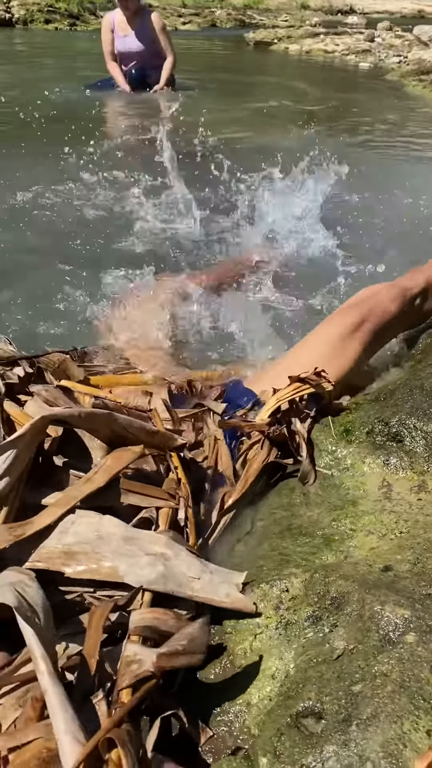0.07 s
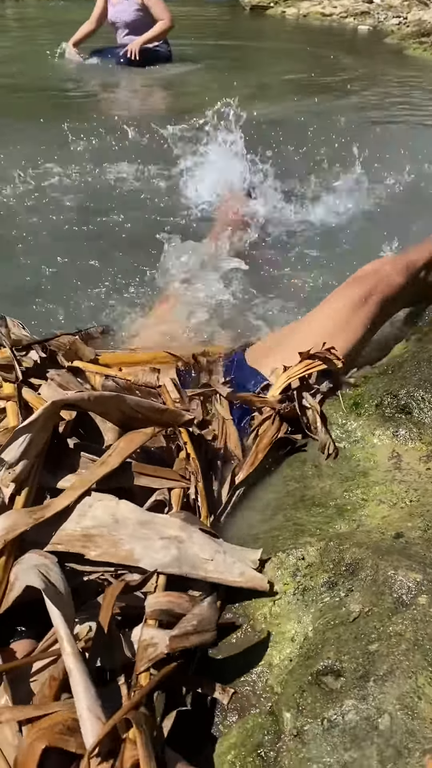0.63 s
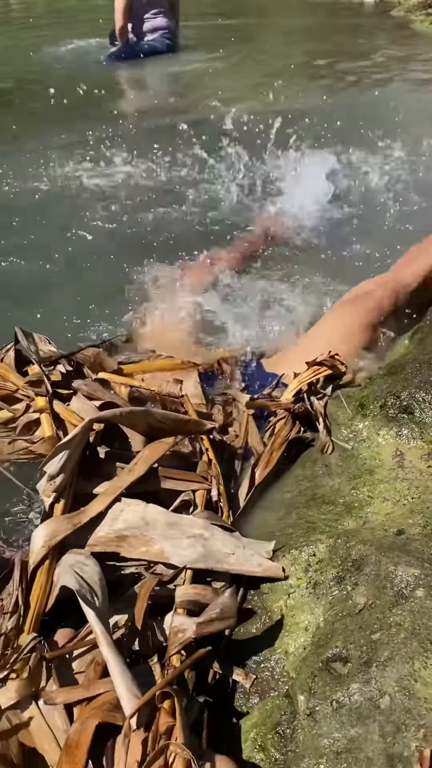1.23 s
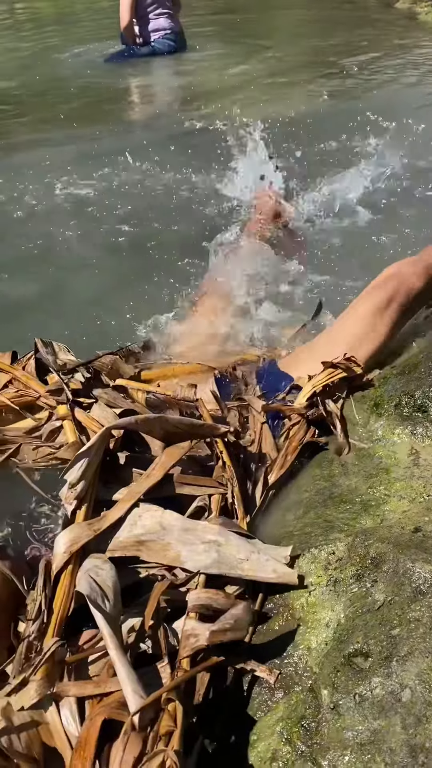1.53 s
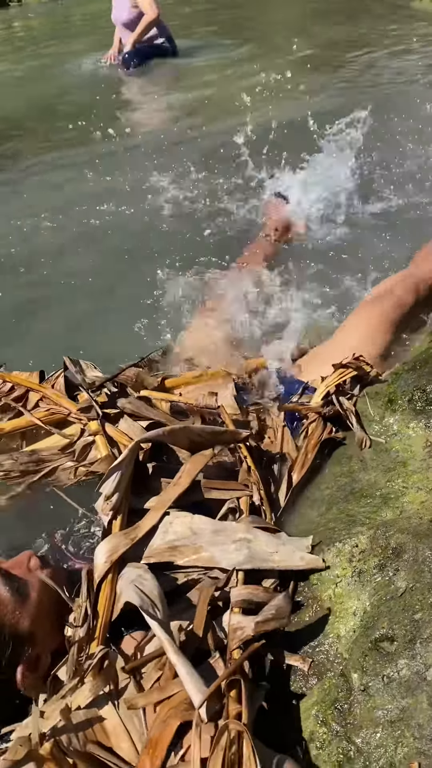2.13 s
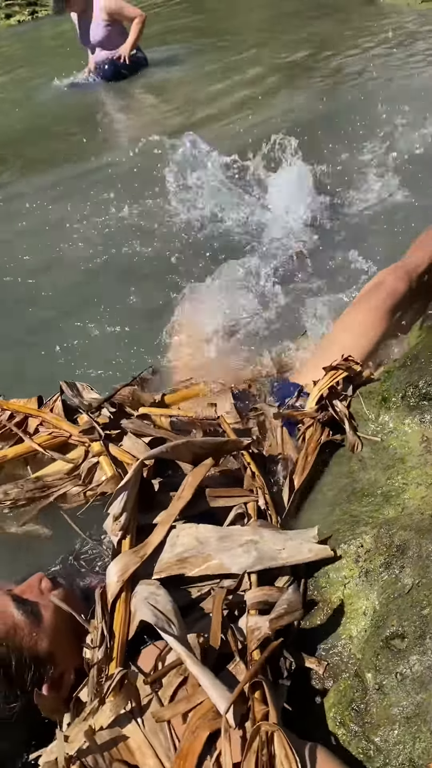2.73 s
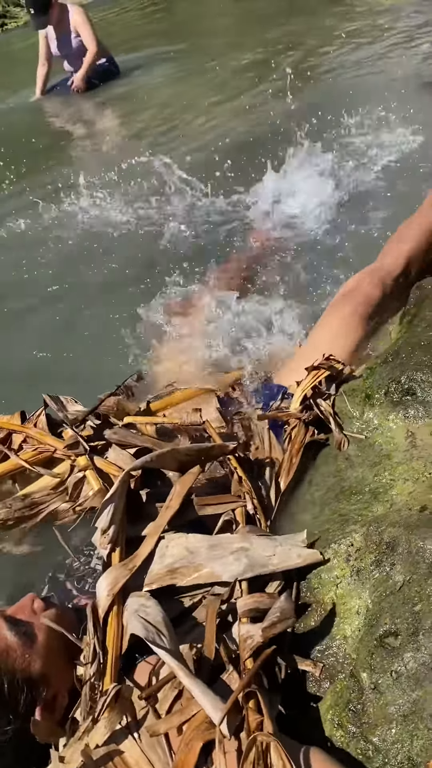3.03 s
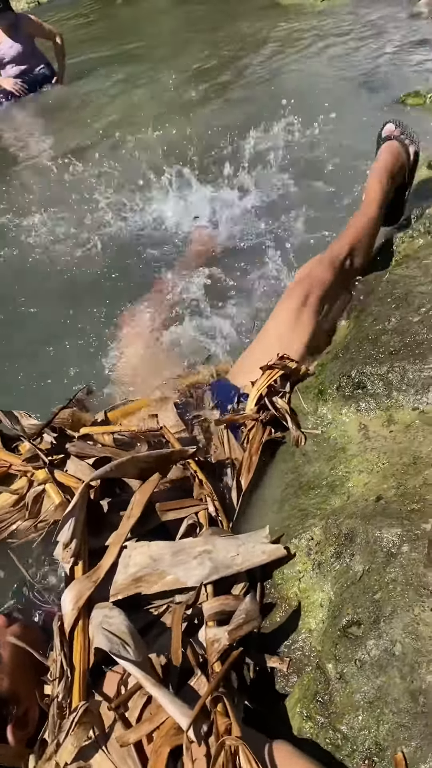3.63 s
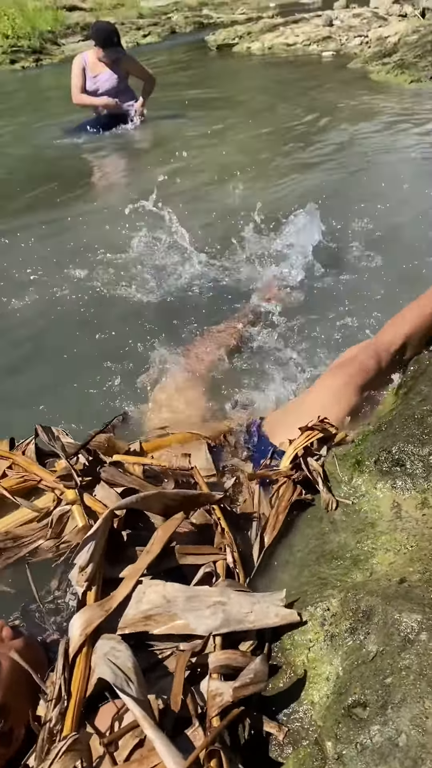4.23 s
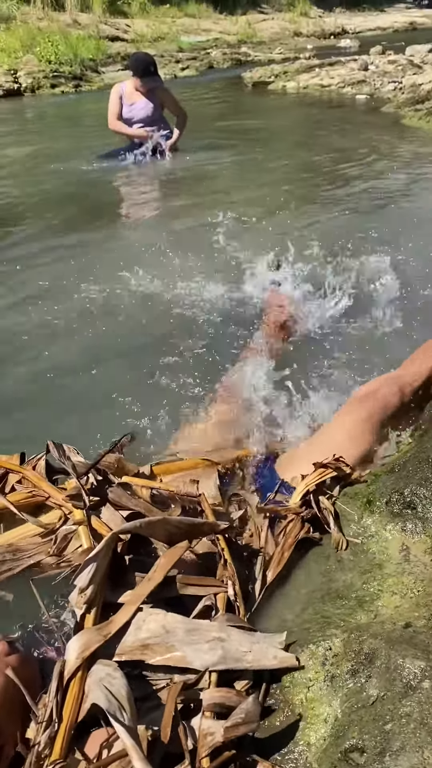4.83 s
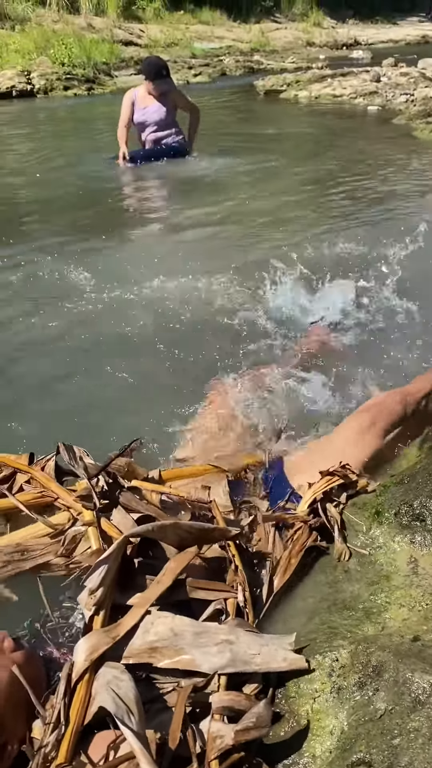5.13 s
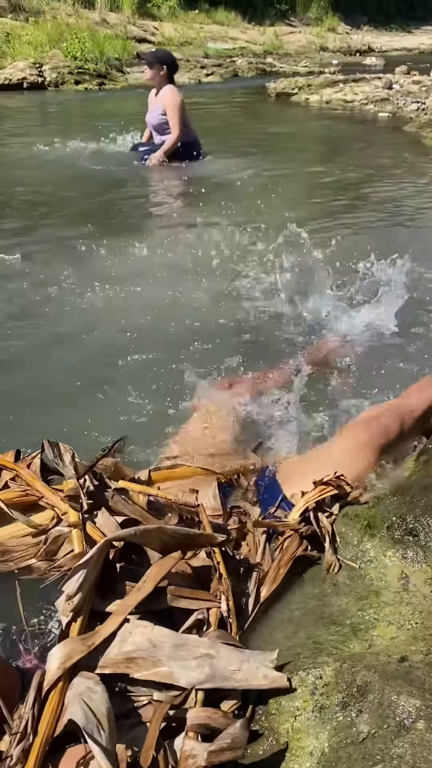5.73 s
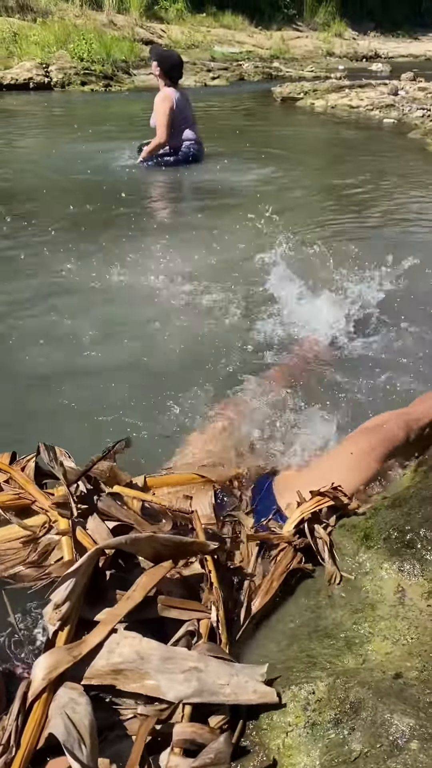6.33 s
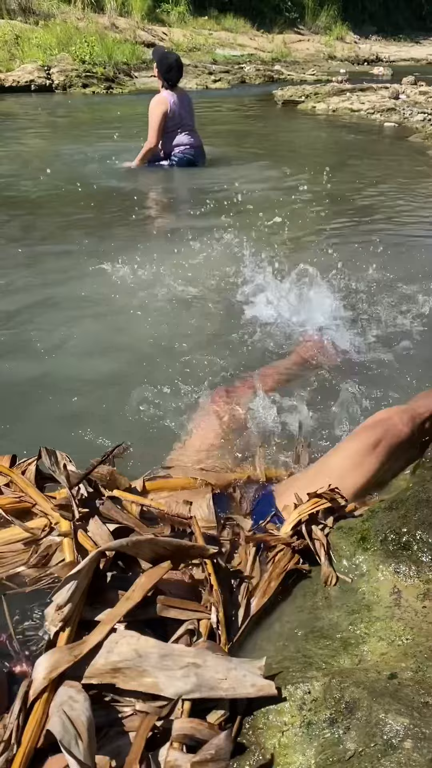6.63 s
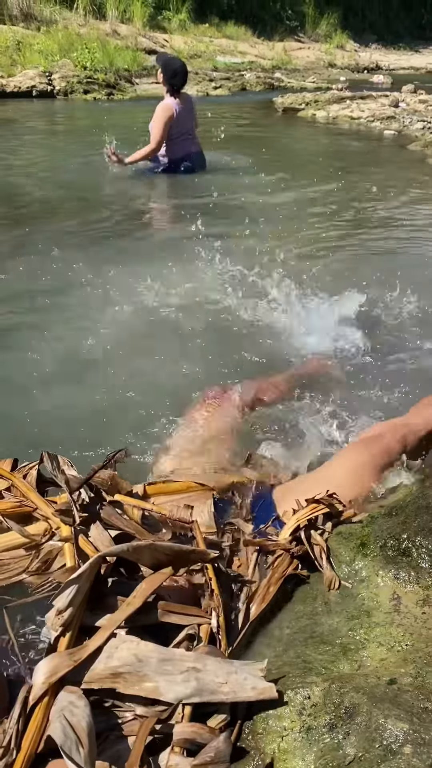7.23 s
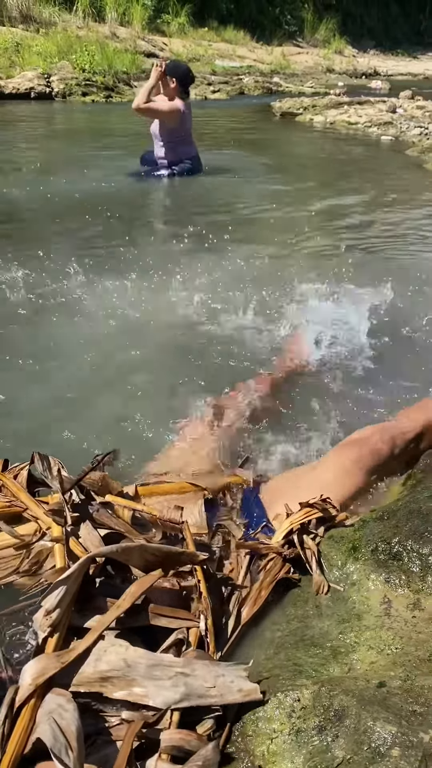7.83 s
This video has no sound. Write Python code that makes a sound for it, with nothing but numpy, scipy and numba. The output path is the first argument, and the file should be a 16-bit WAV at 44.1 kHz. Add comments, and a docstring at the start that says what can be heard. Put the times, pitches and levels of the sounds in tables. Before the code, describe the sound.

A swimmer kicks steadily in a shallow river, with churning bubbles, deep gulps and splashing spray, and light wind on the microphone.

```python
"""A swimmer kicks steadily in a shallow river, a couple of metres from the microphone.
The legs churn air under (gurgling bubbles, single deep gulps) and thrown water falls back
(splash, spray, sharp slaps). Light wind touches the microphone and a faint low drone wavers
behind. Near the end the sound drops out for a moment."""
import sys
import numpy as np
from scipy import signal
from scipy.fft import rfft, irfft, next_fast_len
from scipy.io import wavfile
from scipy.ndimage import uniform_filter1d
from numba import njit

SR = 44100
rng = np.random.default_rng(int(sys.argv[2]) if len(sys.argv) > 2 else 0)


def unload_wav(signal):
    """Save mono or channel-first audio to the path in sys.argv[1] as 16-bit WAV at rate SR, clipped to [-1, 1]."""
    wavfile.write(
        sys.argv[1],
        SR,
        np.round(np.clip(np.atleast_2d(signal).T, -1, 1) * 32767).astype(np.int16),
    )


N = 347067
TIME = np.arange(N) / SR
FFT_SIZE = next_fast_len(N + 4096)
BINS_HZ = np.maximum(np.arange(FFT_SIZE // 2 + 1) * SR / FFT_SIZE, 1)

# A foot drives through the water; levels are against each layer's steady wash:
# (time [s], length [s], churn [dB], gurgle [dB], splash [dB])
FOOT_KICKS = [(0.0, 0.095, -1.5, -1, -5.5), (0.188, 0.056, -7, 0.5, -11.5), (0.25, 0.054, 0, 0, -0.5),
              (0.457, 0.11, 2, 1.5, -2), (0.74, 0.018, -4.5, -8, -2), (0.84, .025, 4, -7.5, -16.5),
              (0.95, 0.061, -18, -10.5, -2), (1.174, .025, 4, -15.5, -4), (1.357, 0.072, 0, -5.5, -5),
              (1.608, 0.05, 0, -0.5, -1), (1.848, 0.014, 3, 3, -14), (2.037, 0.064, -2, 0.5, -5.5),
              (2.252, 0.076, -0.5, -8.5, -1.5), (2.43, 0.14, -9, 1, -12), (2.635, .015, -9, -3, -8),
              (2.794, 0.027, -11, 4.5, -1), (2.89, 0.11, -15, -2, -17), (3.003, 0.031, -5, -12.5, -2.5),
              (3.13, .015, 2.5, -6, -11), (3.258, 0.014, -14, -2, 0), (3.39, .015, -13, -17, -20),
              (3.47, 0.083, -2.5, 0, -5), (3.709, 0.038, 4.5, -5, -5.5), (3.955, 0.072, -5.5, 1.5, -8),
              (4.192, 0.019, -2, 1.5, 0.5), (4.489, 0.017, -12, 6, -0.5), (4.701, 0.062, -15.5, 0.5, -2.5),
              (4.825, 0.012, -11, -0.5, -5), (5.017, 0.17, -0.5, -10, -22), (5.153, 0.11, -6, -4.5, -6.5),
              (5.405, 0.014, -0.5, -2.5, -22), (5.461, 0.04, -13, -7.5, -13.5), (5.745, 0.07, 4, -0.5, -5),
              (6.001, 0.042, 2, -3, -2), (6.431, 0.11, 1, -4.5, -23), (7.569, 0.052, 3, 0, -1),
              (7.738, .025, 4, 2.5, -1)]
# Overall vigour of the kicking: (time [s], gain [dB])
KICK_EFFORT = [(0, -0.1), (1.5, 0.26), (2.2, 0), (3.0, -0.15), (4.4, -0.2), (5.2, 0.03), (6.6, -0.3),
               (7.52, -2.5), (7.62, -2.4), (7.87, -0.6)]
# Between kicks the water briefly settles, or now and then lifts: (centre [s], length [s], gain [dB])
WATER_LULLS = [(0.432, 0.045, -0.5), (0.6, 0.032, -2), (1.633, 0.049, -4.5), (2.223, 0.046, -4),
               (2.7, 0.031, -1.5), (3.37, 0.05, -5.5), (3.69, 0.031, 3), (4.39, 0.057, -3),
               (4.463, 0.034, -0.5), (4.947, 0.036, -1), (5.575, 0.046, -0.5), (5.66, 0.05, -0.5),
               (6.237, .06, 1)]
# The gurgle is darker midway: (time [s], small bubbles against large [dB])
GURGLE_TILT = [(0, 4), (1.5, -0.5), (2.5, -4), (4.3, -2.5), (6.1, 2.5)]
# A wave thrown up by a leg folds over: (time [s], length [s], level [dB])
FOLDING_WAVES = [(0.035, 0.078, -32.5), (0.187, 0.051, -28.5), (0.375, 0.083, -29.5), (0.492, 0.028, -29.5),
                 (0.628, 0.039, -30), (1.066, 0.084, -31.5), (1.265, 0.044, -31), (1.4, 0.055, -28),
                 (1.548, 0.14, -32), (2.076, 0.042, -32), (5.81, 0.063, -30.5), (5.924, 0.11, -29.5),
                 (6.253, 0.017, -34), (6.378, 0.032, -31.5)]
# Water hits the surface, from broad sheets (low, long) to fat drops (high, short):
# (time [s], level [dB], centre [Hz], width [octaves], fade [s])
SURFACE_SLAPS = [(0.192, -20.5, 1400, 1.5, .006), (0.209, -25, 2300, 2.2, .003),
                 (0.2297, -25, 1400, 2.2, .003), (0.3105, -22.5, 5500, 2, .0018),
                 (0.3205, -25.5, 10000, .7, .0015), (0.4189, -28, 7000, 1.5, .002),
                 (0.5083, -26.5, 6000, 1.5, .005), (0.5365, -17, 3000, 2, 0.0035),
                 (0.5425, -22, 3500, 2.7, .0026), (0.752, -20, 1180, 1, 0.0068),
                 (0.772, -23, 1700, 1.8, .007), (0.781, -24, 1800, 2, .005), (0.805, -33, 7000, 1, 0.0044),
                 (0.868, -23, 2100, 1.3, .005), (0.982, -23, 2200, 1.8, .007),
                 (1.058, -22.5, 8500, 0.68, .0016), (1.203, -21, 2280, 0.88, .0033),
                 (1.222, -21, 1700, 0.98, .005), (1.5025, -27, 8000, 1, 0.0024),
                 (1.6774, -27, 7000, 2, .002), (2.4415, -27, 3000, 3.7, .005),
                 (2.4448, -17.5, 8580, 1.8, 0.0028), (2.898, -29, 5500, 2, .0026),
                 (3.1208, -21, 2300, 0.66, .003), (3.272, -29, 7000, 2, .0016),
                 (3.397, -26, 1700, 1.8, .0015), (3.485, -27.5, 8500, 1.2, 0.014),
                 (3.667, -24.5, 8470, 1, 0.0022), (3.7514, -23, 1350, 1.6, .005),
                 (3.7941, -22, 1330, 1.05, .0055), (3.994, -21.5, 1400, 2, .0048),
                 (4.005, -24, 7440, 1.3, 0.0021), (4.2028, -20, 1690, 1.4, 0.0037),
                 (4.2223, -25.5, 2600, 1.4, 0.00343), (4.326, -24, 4980, 1.6, .002),
                 (4.5138, -22.5, 1900, 1.5, 0.0061), (4.5381, -26, 7000, 1.05, 0.0022),
                 (4.73, -23, 7550, 1.5, 0.0029), (4.9044, -25.5, 1850, 1.5, .003),
                 (5.128, -22, 1500, 2, 0.0054), (5.2338, -21.5, 8070, 1.2, .002),
                 (5.264, -26, 10100, .7, .0015), (5.4475, -30.5, 7070, 1.8, .0017),
                 (5.5, -26, 2200, 1.3, 0.017), (5.7543, -24.5, 1697, 1.4, 0.0046),
                 (5.906, -22, 3000, 1.53, 0.0035), (6.35, -23, 7460, 1.04, 0.0035),
                 (6.5058, -25.5, 8000, 1.2, 0.0027), (7.634, -25, 2180, 1.04, 0.0093),
                 (7.7134, -33, 2000, 1.8, .005)]

# Short rings: (time [s], level [dB], pitch [Hz], fade [cycles])
AIR_GULPS = [(0.032, -20.5, 440, 4), (0.066, -26, 230, 2), (0.197, -21.5, 199, 1.4),
             (0.2188, -19.5, 625, 4), (0.228, -29, 230, 2.2), (0.2291, -15, 1070, 1.1),
             (0.2777, -20, 376, 3.5), (0.3028, -18.5, 400, 4.5), (0.445, -20, 273, 0.79),
             (0.4753, -16.5, 610, 2), (0.5123, -17.5, 724, 1), (0.5277, -29.5, 442, 4),
             (0.5671, -20.5, 590, 2), (0.6147, -17.5, 1180, 1.7), (0.6478, -18.5, 690, 4.3),
             (0.7566, -19.5, 707, 6), (0.7713, -22.5, 390, 3.2), (0.7878, -25, 370, 3),
             (0.8831, -20.5, 610, 4), (1.014, -24, 427, 4), (1.0588, -15.5, 1200, 2.5),
             (1.1922, -19, 825, 4.4), (1.198, -27, 347, 4.4), (1.345, -21.5, 720, 2.5),
             (1.4523, -18.5, 440, 3.5), (1.5728, -18.5, 487, 3.7), (1.8563, -21.5, 310, 1.8),
             (1.9859, -16.5, 910, 3), (2.037, -24, 190, 1.4), (2.0947, -25, 540, 4),
             (2.1328, -15.5, 930, 3.7), (2.3057, -22, 270, 1.3), (2.35, -25.5, 220, 4.3),
             (2.474, -14, 550, 1.7), (2.5611, -24.5, 480, 5.7), (2.6037, -21, 530, 3.4),
             (2.6369, -23, 298, 4), (2.6496, -16.5, 517, 0.84), (2.7975, -20, 360, 3.7),
             (2.8189, -20, 488, 4.5), (2.831, -22, 864, 2.5), (2.9908, -22, 494, 3.5),
             (3.022, -21.5, 860, 2.5), (3.0335, -23, 475, 4), (3.063, -25, 245, 2), (3.1104, -17, 289, 3.3),
             (3.1556, -16.5, 494, 1.5), (3.22, -18, 700, 3.7), (3.2834, -17, 500, 1.8),
             (3.3865, -17, 697, 1.5), (3.3945, -16.5, 750, 1.4), (3.401, -22.5, 517, 1.5),
             (3.488, -26, 180, 3), (3.5039, -22, 520, 3.8), (3.556, -22, 580, 1.7),
             (3.6071, -17.5, 515, 2.15), (3.635, -22, 424, 4), (3.9802, -18, 511, 1.6),
             (4.0619, -19.5, 544, 4), (4.292, -24.5, 200.3, 1.3), (4.298, -20, 475, 5.7),
             (4.4981, -25, 524, 4.9), (4.5148, -20, 514, 2.9), (4.608, -18.5, 503, 2.4),
             (4.655, -26.5, 278, 3.5), (4.7347, -21.5, 494, 0.79), (4.7835, -19, 477, 4),
             (4.845, -22, 320, 1.6), (5.0262, -20, 420, 0.63), (5.112, -21, 603, 4.3),
             (5.1668, -15, 506, 2), (5.2798, -17.5, 567, 1.15), (5.408, -25, 273.6, 3),
             (5.4244, -14.5, 261, 2), (5.4703, -13.5, 1094, 2.2), (5.4795, -15, 466, 0.8),
             (5.5024, -17, 456, 3.1), (5.772, -21.5, 515, 4), (5.81, -19, 505, 5), (6.027, -19.5, 447, 2),
             (6.048, -20.5, 222, 1.7), (6.4497, -22.5, 436, 4), (6.53, -21.5, 350, 2.6),
             (6.59, -16.5, 1015, 2.4), (7.585, -23.5, 480, 1.86), (7.626, -19.5, 1010, 3.4),
             (7.7644, -20.5, 515, 5.1)]  # air pockets closing behind a foot
DROP_PLINKS = [(0.2101, -15, 2880, 5.5), (0.5955, -16, 2670, 5), (0.6005, -18, 2950, 5),
               (0.7713, -8.5, 5000, 2.6), (0.872, -20, 2180, 5.5), (0.897, -21.5, 3900, 5),
               (0.9853, -17, 1440, 5.7), (1.2035, -18, 3120, 3), (2.8989, -15.5, 4365, 5),
               (3.0653, -15.5, 4756, 5), (3.1224, -16.5, 4320, 5), (3.3865, -19.5, 1780, 3.6),
               (3.3935, -17, 1970, .8), (4.2023, -19.5, 1998, 2.8), (5.2523, -21.5, 6650, 5),
               (5.9066, -13.5, 3370, 5.3), (6.4015, -18, 5430, 4), (7.636, -23, 2190, 8),
               (7.7582, -17, 3350, 5), (7.803, -20, 3500, 5)]  # single drops, from dry ticks to short rings
WIND_THUMPS = [(3.533, -24, 153.5, .75), (5.073, -21.5, 139, 0.83), (5.144, -21, 83, .75),
               (5.213, -20, 129.7, 0.95), (5.226, -27, 71.8, .75), (6.516, -21, 95, 0.68),
               (6.593, -25.5, 114.8, .75), (7.701, -22.5, 80, 0.99), (7.829, -28, 91, 0.81)]  # gusts hitting the microphone

# The breeze on the microphone slowly freshens: (time [s], level [dB])
BREEZE_LEVEL = [(0, -54), (2.0, -59), (2.7, -50), (3.2, -54), (4.3, -48.5), (5.1, -38.5), (5.7, -43.5),
                (6.3, -45), (7.87, -40)]
# Gusts on top of it: (centre [s], length [s], level [dB])
WIND_GUSTS = [(3.551, .071, -39.5), (4.697, .4, -54), (5.089, .18, -39), (5.236, .05, -28),
              (5.502, .3, -45.5), (5.951, .1, -40.5), (6.519, 0.13, -31.5), (7.725, .19, -34)]
# The low drone in the background: (time [s], pitch [Hz], level [dB])
DRONE_COURSE = [(0.95, 79.96, -49), (1.05, 94, -38.5), (1.15, 96, -36.5), (1.21, 80, -53),
                (1.29, 76.4, -39), (1.38, 76, -46.5), (1.45, 84.4, -50.5), (1.54, 93, -38), (1.7, 84, -49),
                (1.86, 86, -46.5), (1.95, 89, -42), (2.1, 93, -38.5), (2.24, 100.7, -41), (2.45, 105, -36),
                (2.63, 101, -39), (2.8, 101, -53), (2.93, 101.7, -39), (3.07, 101, -36),
                (3.17, 107.2, -46.5), (3.35, 111.3, -40), (3.68, 77.6, -48.5), (3.87, 79.2, -34),
                (4.05, 101, -48), (4.35, 93.7, -46), (4.6, 100.6, -35), (4.9, 83, -54.5), (5.5, 79.9, -39),
                (6.3, 79, -43), (7.87, 74.6, -35)]

# Colour of each layer from the microphone position: (frequency [Hz], gain [dB])
CHURN_SPECTRUM = [(25, -50.5), (50, -23), (110, -3), (170, -2.5), (260, 3.5), (340, 3.5), (430, -8),
                  (700, -30), (2000, -71)]
GURGLE_SPECTRUM = [(100, -32), (260, -24.5), (370, -4.5), (500, -0.2), (600, -1), (720, -4), (900, -6.5),
                   (1200, -17.5), (2000, -35), (4000, -60)]
SPLASH_SPECTRUM = [(60, -52.5), (400, -26), (800, 4), (1150, 1.5), (1500, -1.5), (2100, -5.5), (2800, -2.5),
                   (3800, -9.5), (4800, -10), (6500, -16), (12000, -11)]
SPRAY_SPECTRUM = [(60, -29.5), (400, -9.5), (2000, 2.5), (4000, -1.5), (5200, -4), (6300, -2.5),
                  (8000, -5.5), (11500, -7.5), (13500, -15.5), (16000, -29)]
SLOSH_SPECTRUM = [(350, -43.5), (600, -4.5), (780, 2), (1150, 1), (1500, -8.5), (2600, -34.5)]
BREEZE_SPECTRUM = [(15, -48.5), (30, -35.5), (52, -0.5), (75, -5), (110, -7), (170, -10.5), (260, -18),
                   (600, -41.5), (2000, -74.5)]
GUST_SPECTRUM = [(15, -31.5), (30, -18.5), (50, 1), (75, 6), (110, -10), (170, -4), (260, -24), (600, -42),
                 (2000, -79.5)]

# Stereo image: how alike left and right sound, and their phase and level by frequency;
# the top treble is in opposite phase.
STEREO_LIKENESS = [(30, .94), (60, .9), (140, .9), (250, .97), (500, .87), (720, .54), (1400, .58),
                   (1950, .88), (3300, .52), (4400, .6), (5500, .45), (6500, .97), (8700, .95), (10000, .6),
                   (11800, .68), (12800, 1)]  # (frequency [Hz], likeness [0-1])
LEFT_PHASE_LEAD = [(300, 0), (800, -.7), (1300, -1.1), (1700, 0), (2200, .4), (3000, 1.55), (4500, .9),
                   (5200, 2.7), (5900, 6.3), (9000, 6.3), (10000, 7.9), (12000, 8.6), (12800, 3 * np.pi)]  # (frequency [Hz], left leads by [rad])
LEFT_OVER_RIGHT = [(120, 0), (300, 1), (500, 2.3), (1000, 1), (1450, -1.3), (2000, 0), (2700, -2.5),
                   (5000, -2.8), (6000, 0)]  # (frequency [Hz], left over right [dB])

CHURN_DB, GURGLE_DB, SPLASH_DB, SPRAY_DB = -37, -30.5, -28.5, -32  # base levels of the steady wash


def swimmer(splash_lull_share=.39, spray_follows=.58):
    """A couple of metres off, each kick swells the bubbles below and the falling water above."""
    starts, lengths, *layer_levels = np.transpose(FOOT_KICKS)
    churn_db, gurgle_db, splash_db = [kick_swell(zip(starts, lengths, db)) for db in layer_levels]
    effort_db, = in_time(KICK_EFFORT)
    lull_db = sum(db * bell(s, length) for s, length, db in WATER_LULLS)
    splash_db += splash_lull_share * lull_db
    below = from_db(CHURN_DB + churn_db) * evened(churn(), window_s=.07)
    below += from_db(GURGLE_DB + gurgle_db) * evened(gurgle(), window_s=.045)
    above = from_db(SPLASH_DB + splash_db) * evened(splash(), window_s=.035)
    above += from_db(SPRAY_DB + spray_follows * splash_db) * evened(spray(), window_s=.025)
    return from_db(effort_db) * (from_db(lull_db) * below + above)


def kick_swell(kicks):
    """Each kick adds its power to the steady wash; gives the rise in dB."""
    power = np.ones(N)
    for s, length, db in kicks:
        add(power, s, (from_db(db) * burst(length, attack_s=.016, release_s=.075)) ** 2)
    return 10 * np.log10(power)


def churn():
    """The thighs push big pockets of air under: slow, deep glugs."""
    bubbles = bubble_cloud(per_s=380, low_hz=120, high_hz=440, cycles=9, rise=.2, spread_db=1.5)
    return colour(bubbles + wash(), CHURN_SPECTRUM)


def gurgle(split_hz=660):
    """Bubbles boil up around the feet, the weight shifting between large and small ones."""
    bubbles = bubble_cloud(per_s=1000, low_hz=330, high_hz=1500, cycles=38, rise=.07, spread_db=1.3)
    boil = colour(bubbles + from_db(-2) * wash(), GURGLE_SPECTRUM)
    large = signal.sosfiltfilt(signal.butter(2, split_hz, fs=SR, output="sos"), boil)
    tilt_db, = in_time(GURGLE_TILT)
    return from_db(-tilt_db / 2) * large + from_db(tilt_db / 2) * (boil - large)


def splash():
    """Thrown water falls back in clumps and beats small bubbles into the river; some ring clearly."""
    bubbles = bubble_cloud(per_s=3000, low_hz=724, high_hz=6040, cycles=16.4, rise=.23, spread_db=2)
    clear = bubble_cloud(per_s=420, low_hz=1000, high_hz=6000, cycles=100, rise=.04, spread_db=1.2)
    clumps = (bubbles + from_db(2) * wash()) * patter(per_s=1500, fade_s=.005, spread_db=1.6)
    return colour(clumps + from_db(-2.5) * clear, SPLASH_SPECTRUM)


def spray():
    """Fine drops tick on the river over fizzing foam."""
    foam = bubble_cloud(per_s=900, low_hz=3200, high_hz=15000, cycles=220, rise=.01, spread_db=1.7)
    ticks = wash() * patter(per_s=200, fade_s=.002, spread_db=1.4)
    return colour(foam + from_db(1.5) * ticks + from_db(2.5) * wash(), SPRAY_SPECTRUM)


def sloshes():
    """A wave folding off a leg traps a burst of middle-sized bubbles."""
    level = np.zeros(N)
    for s, length, db in FOLDING_WAVES:
        add(level, s, from_db(db) * burst(length, attack_s=.003, release_s=.012))
    bubbles = bubble_cloud(per_s=900, low_hz=620, high_hz=1500, cycles=22, rise=.15, spread_db=1.5)
    return level * evened(colour(bubbles + from_db(-4) * wash(), SLOSH_SPECTRUM), window_s=.04)


def air_pockets(rings, swell_cycles, glide):
    """A pocket of air is set swinging: it swells quickly and dies away, gliding in pitch."""
    out = np.zeros(N)
    for s, db, hz, fade_cycles in rings:
        cycle = TIME[:SR // 10] * hz
        shape = (1 - np.exp(-cycle / swell_cycles)) ** 2 * np.exp(-cycle / fade_cycles)
        tone = np.sin(2 * np.pi * cycle * (1 + glide * cycle))
        add(out, s, from_db(db) * shape / shape.max() * tone)
    return out


def slaps(tail_s, tail_db):
    """Water slaps the surface: a sudden crack in its own band, then a short scatter of droplets."""
    out, t = np.zeros(N), TIME[:SR // 12]
    for s, db, hz, octaves, fade_s in SURFACE_SLAPS:
        edge_ratio = 2 ** (max(octaves, .5) / 2)
        edges_hz = [hz / edge_ratio, min(hz * edge_ratio, 15000)]
        band = signal.butter(3, edges_hz, "band", fs=SR, output="sos")
        crack = evened(signal.sosfilt(band, rng.standard_normal((1, len(t)))), window_s=.002)[0]
        shape = np.hypot(np.exp(-t / fade_s), from_db(tail_db) * np.exp(-t / tail_s))
        add(out, s, from_db(db) * crack * shape)
    return out


def stray_drops():
    """Stray drops land close to the microphone with short sharp ticks."""
    return colour(wash() * patter(per_s=30, fade_s=.0007, spread_db=1.2), SPRAY_SPECTRUM)


def bubble_cloud(per_s, low_hz, high_hz, cycles, rise, spread_db):
    """Bubbles of random pitch, size and bearing, as a direct and a scattered part; rms 1."""
    when, pitch, size, bearing, ring = rng.random((int(per_s * N / SR), 5)).T
    hz = low_hz * (high_hz / low_hz) ** pitch
    strength = hz * from_db(spread_db * np.minimum(-np.log(1 - size), 4))
    angle = 2 * np.pi * bearing
    weights = strength[:, None] * np.stack([np.cos(angle), np.sin(angle)], axis=1)
    starts, phase_steps = (when * N).astype(np.int64), 2 * np.pi * hz / SR
    return rms_one(ring_bubbles(starts, phase_steps, weights, cycles * (.5 + ring), float(rise), N))


@njit
def ring_bubbles(starts, phase_steps, weights, cycles, rise, length):
    """Each bubble is a sine that dies by 60 dB and climbs in pitch as it nears the surface."""
    out = np.zeros((2, length))
    for k in range(len(starts)):
        life = cycles[k] * 2 * np.pi / phase_steps[k]
        for i in range(min(int(life), length - starts[k])):
            age = i / life
            phase = phase_steps[k] * i * (1 + rise * age / 2)
            wave = np.sin(phase) * np.exp(-np.log(1000) * age) * (1 - np.exp(-phase / 2))
            out[0, starts[k] + i] += weights[k, 0] * wave
            out[1, starts[k] + i] += weights[k, 1] * wave
    return out


def patter(per_s, fade_s, spread_db):
    """Falling water: a level that jumps at each landing and fades; rms 1."""
    lands = rng.random(N) < per_s / SR
    strength = from_db(spread_db * np.minimum(rng.exponential(1, N), 4))
    decay = np.exp(-1 / (fade_s * SR))
    return rms_one(np.sqrt(signal.lfilter([1], [1, -decay], (lands * strength) ** 2 + 1e-12)))


def wash():
    """Countless tiny events merge into a smooth rush, as a direct and a scattered part."""
    return rng.standard_normal((2, N))


def wind():
    """A light breeze right on the microphone, with gusts that weigh more in the bass."""
    breeze_db, = in_time(BREEZE_LEVEL)
    gusts = sum(from_db(db) * bell(s, length) for s, length, db in WIND_GUSTS)
    return from_db(breeze_db) * buffeting(BREEZE_SPECTRUM) + gusts * buffeting(GUST_SPECTRUM)


def buffeting(spectrum):
    """Air eddies on the microphone in uneven lumps."""
    return evened(colour(wash(), spectrum), window_s=.13) * from_db(2 * drift(12))


def drone():
    """Behind the swimmer, a faint low tone wavers unevenly in pitch and level."""
    hz, db = in_time(DRONE_COURSE)
    phase = 2 * np.pi * np.cumsum(hz * (1 + .06 * drift(18))) / SR
    return from_db(db + 2.8 * drift(16)) * np.sin(phase)


def stereo_image(direct, scattered):
    """Left and right share the direct part, differ by the scattered, and are offset in level and phase."""
    alike = np.clip(at_hz(STEREO_LIKENESS), 0, 1)
    sides = np.array([[1], [-1]])
    shared = np.sqrt((1 + alike) / 2) * rfft(direct, FFT_SIZE)
    apart = np.sqrt((1 - alike) / 2) * rfft(scattered, FFT_SIZE)
    pair = (shared + sides * apart) * from_db(sides * at_hz(LEFT_OVER_RIGHT) / 2)
    pair[1] *= np.exp(-1j * at_hz(LEFT_PHASE_LEAD))
    return irfft(pair, FFT_SIZE)[:, :N]


def from_db(db):
    """Decibels to gain."""
    return 10 ** (np.asarray(db) / 20)


def rms_one(x):
    """Scale to rms 1."""
    return x / np.sqrt(np.mean(x ** 2) + 1e-20)


def in_time(rows):
    """Each column of a curve at every sample."""
    s, *columns = np.transpose(rows)
    return [np.interp(TIME, s, column) for column in columns]


def at_hz(points):
    """A spectrum table at every frequency bin."""
    hz, values = np.transpose(points)
    return np.interp(np.log(BINS_HZ), np.log(hz), values)


def colour(x, spectrum):
    """Shape a sound by a spectrum; rms 1."""
    return rms_one(irfft(rfft(x, FFT_SIZE) * from_db(at_hz(spectrum)), FFT_SIZE)[..., :N])


def evened(x, window_s):
    """Hold the level steady over a short window, keeping the grain inside it."""
    power = uniform_filter1d(np.mean(x ** 2, axis=0), max(int(window_s * SR), 1))
    return x / np.sqrt(power + 1e-6)


def drift(rate_hz, hop=40):
    """A random wander of rms 1, mostly slower than rate_hz."""
    pole = np.exp(-2 * np.pi * hop * rate_hz / SR)
    noise = rng.standard_normal(N // hop + 2002)
    slow = signal.lfilter([1], [1, -2 * pole, pole * pole], noise)[2000:]  # once settled
    return np.interp(np.arange(N) / hop, np.arange(len(slow)), rms_one(slow))


def burst(length_s, attack_s, release_s):
    """A level that rises quickly and dies away after length_s."""
    t = TIME[:SR // 2]
    return np.minimum(t / attack_s, 1) * np.exp(-np.maximum(t - length_s, 0) / release_s)


def bell(s, length):
    """A smooth hump of height 1 around time s."""
    return np.exp(-(2 * (TIME - s) / length) ** 2)


def add(out, s, sound):
    """Mix a short sound in at time s."""
    start = int(np.clip(s * SR, 0, N - 1))
    out[..., start:start + sound.shape[-1]] += sound[..., :N - start]


def scene():
    """The swimmer in front, wind on the microphone, the drone behind."""
    gulps = air_pockets(AIR_GULPS, swell_cycles=.87, glide=.0012)
    plinks = air_pockets(DROP_PLINKS, swell_cycles=.47, glide=.0019)
    cracks = slaps(tail_s=.011, tail_db=-16)
    drops = from_db(-45) * stray_drops()
    thumps = air_pockets(WIND_THUMPS, swell_cycles=.51, glide=-.0072)
    direct, scattered = swimmer() + sloshes() + drops + wind()
    return stereo_image(direct + gulps + plinks + cracks + thumps + drone(), scattered)


def record(dry):
    """The sound drops out for a moment near the end; the highest treble is cut."""
    silent_from_s, silent_to_s, fade_s, cutoff_hz = 6.628, 7.515, .003, 15800
    outside_s = np.maximum(silent_from_s - TIME, TIME - silent_to_s)
    live = np.clip(outside_s / fade_s + 1, 0, 1)
    lowpass = signal.ellip(10, .1, 90, cutoff_hz, fs=SR, output="sos")
    return signal.sosfilt(lowpass, dry * live + 1e-18)


dry = scene()
out = record(dry)
unload_wav(out)
```